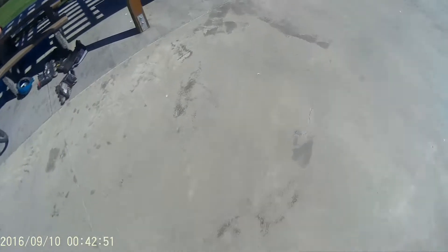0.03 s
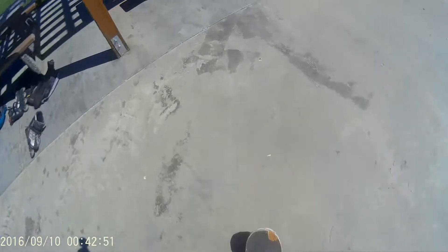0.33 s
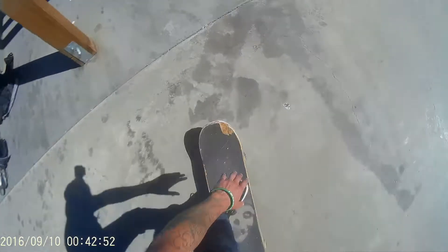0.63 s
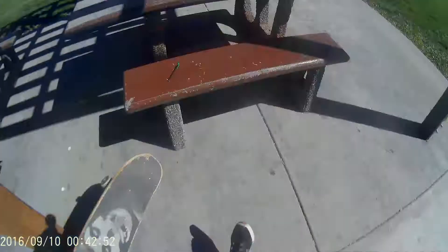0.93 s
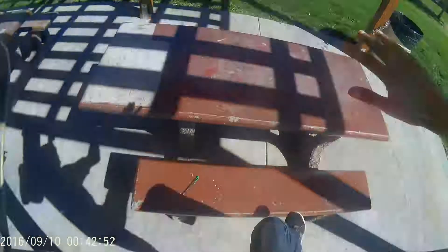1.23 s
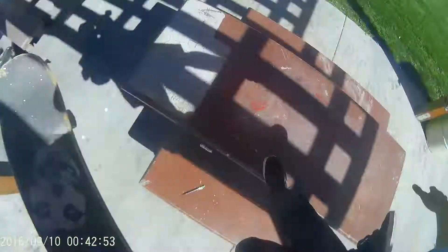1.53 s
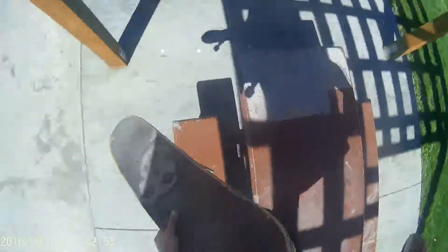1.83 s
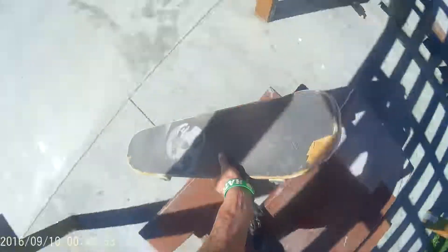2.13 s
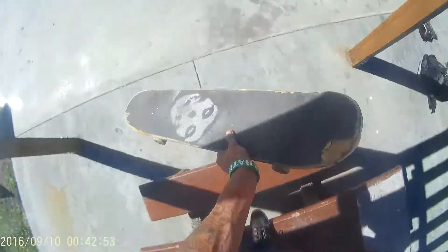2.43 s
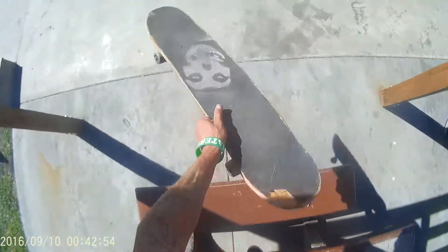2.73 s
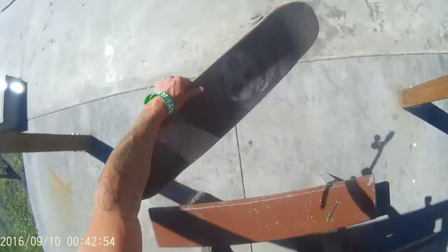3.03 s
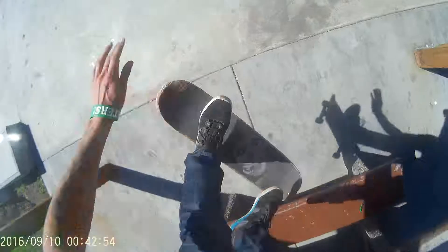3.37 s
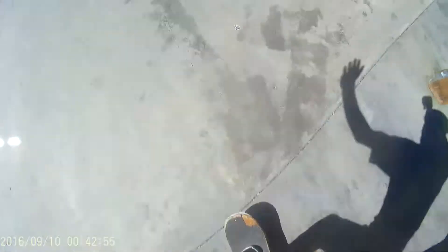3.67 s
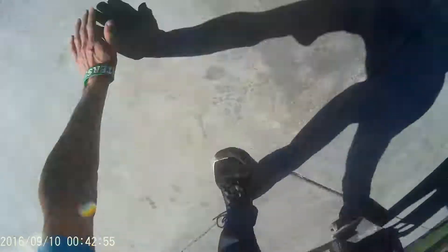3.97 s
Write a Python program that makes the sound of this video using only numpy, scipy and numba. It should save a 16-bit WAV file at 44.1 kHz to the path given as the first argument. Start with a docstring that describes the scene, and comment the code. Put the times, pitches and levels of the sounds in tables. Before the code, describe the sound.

Skateboard wheels rumble, spin freely while carried, then the board slams down and rolls off.

```python
"""A concrete yard with a picnic table, heard up close from a body camera.
A skateboard rumbles over grit, is flipped up with a scrape and a squeak, and is carried over the
table, wheels spinning down, loose trucks ticking, soles thumping softly. It is dropped and landed on,
clatters and rolls away. The camera's case rings near 700 Hz and the landing overloads the microphone;
behind it all lie a faint echo and the open air."""
import sys
import numpy as np
from scipy import signal
from scipy.fft import rfft, irfft
from scipy.io import wavfile
from scipy.ndimage import uniform_filter1d, map_coordinates
from numba import njit

SR = 44100
rng = np.random.default_rng(int(sys.argv[2]) if len(sys.argv) > 2 else 0)


def dump_mix(stems):
    """Bounce the given channels to the path in sys.argv[1] as a 16-bit WAV at rate SR."""
    frames = np.atleast_2d(stems).T  # one column per channel
    limited = np.clip(frames, -1, 1)  # hard clip at full scale
    pcm = np.round(limited * 32767).astype(np.int16)
    wavfile.write(sys.argv[1], SR, pcm)


N = 176400
TIME_S = np.arange(N) / SR


# Wheels rolling in and away, deck groan, bearing rattle: time_s, level_db
ROLL_IN = [(0, -22), (.3, -24.5), (.48, -20.5), (.6, -19), (.72, -21.5), (.74, -23), (.768, -29.5),
           (.79, -53), (1.1, -48)]
ROLL_AWAY = [(3.56, -50), (3.62, -46), (3.69, -40.5), (3.78, -36.5), (3.81, -33.5), (3.85, -23),
             (3.88, -23.5), (3.915, -37), (3.945, -29.5), (4.0, -29)]
GROAN = [(.62, -39), (.665, -28), (.725, -40.5), (.77, -52)]
RATTLE = [(0, -60), (.42, -64), (.57, -53.5), (.62, -61), (.638, -34.5), (.66, -47), (.85, -48.5),
          (1.0, -74), (3.6, -65.5), (3.67, -56), (3.8, -58), (3.85, -39.5), (3.88, -29.5), (3.91, -46),
          (3.97, -32), (4.0, -44.5)]
# Rumble and rattle at the microphone: frequency_hz, gain_db
RUMBLE_COLOUR = [(35, -54), (60, -33.5), (90, -46.5), (133, -17), (193, -23), (236, -20), (335, -5),
                 (440, -10), (590, 1.5), (690, 2.5), (800, -8.5), (1120, -23), (1470, -40), (2300, -51.5),
                 (2870, -54.5), (5000, -89)]
RATTLE_COLOUR = [(700, -17), (1100, 10.5), (1600, -2), (2000, 0.5), (2400, -1.5), (2800, -21),
                 (3600, -26.5), (6300, -30), (7500, -30), (10000, -40.5)]

def rolling():
    """Grit under the wheels shakes the deck, which groans as it tips; the loaded bearings rattle."""
    jolts = undb(.6 * walk(per_s=62))
    rumble = colour(grains(), RUMBLE_COLOUR) * (fader(ROLL_IN) + fader(ROLL_AWAY))
    groan = unit(resonate_twice(noise(), hz=251.5, width_hz=45)) * fader(GROAN)
    rattle = colour(grains(), RATTLE_COLOUR) * fader(RATTLE)
    return jolts * (rumble + groan + rattle)


# Blows to the board, the landing loudest: start_s, boom_db, boom_pitch_hz, push_ms, clack_db
KNOCKS = [(.178, -21.5, 672, 3, -59), (.517, -8.5, 621, 5.7, -49.5), (.592, -10, 650, 2.6, -48),
          (.628, -19, 720, 1.6, -27), (.6365, -10.5, 727, 4, -30), (.696, -8.5, 744, 4.3, -55),
          (.7205, -6.5, 870, 1.74, -14), (1.016, -27, 417, 0.38, -49), (1.266, -26, 710, 1.5, -58),
          (1.357, -28.5, 705, 22, -54), (3.485, -25, 700, 5.2, -33), (3.5581, 15.5, 648, 3.2, 3),
          (3.5648, 10, 674, 1.06, 8.5), (3.5693, 17, 710, 0.6, 15), (3.5797, 9, 702, 2.5, -4),
          (3.5915, -5.5, 598, 2, -15), (3.619, -24, 630, 4.5, -39), (3.669, -27, 730, 1.6, -36),
          (3.7426, -5, 737, 6.2, -17.5), (3.768, -12.5, 719, 5, -9.5), (3.807, -20.5, 720, 4.4, -45.5),
          (3.8624, -6.5, 703, 1.82, 10), (3.8747, -9.5, 827, 1.1, -32), (3.941, -16, 720, 0.94, -23.5),
          (3.9673, -15.5, 783, 1.96, -10.5)]
# Hollow boom at the camera: pitch_ratio, level_db, t60_s
BOOM_MODES = [(0.189, -28, 0.029), (0.499, -17.5, 0.045), (.76, -16.5, 0.03), (1, 1, 0.032),
              (1.42, -16, 0.038)]
# Ring of deck and trucks: pitch_hz, level_db, t60_s
DECK_MODES = [(1035, -10.5, 0.013), (1390, -9.5, 0.014), (1617, 1, 0.013), (1932, -4.5, 0.0076),
              (2220, -6, 0.0077), (3140, -17.5, 0.022)]
# Crack of hard contact: frequency_hz, gain_db
CRACK_COLOUR = [(200, -24), (700, 6), (1600, -4), (2400, 3.5), (3500, -19.5), (7500, -21), (14000, -35.5)]

def knocks():
    """Each blow booms, rings the deck and cracks; a longer push rises slower and sounds duller."""
    spread_db, detune = 3, .03
    out, t = np.zeros(N), TIME_S[:N // 16]
    cracks = undb(-8.5) * colour(noise(), CRACK_COLOUR)
    for start, boom_db, boom_hz, push_ms, clack_db in KNOCKS:
        share, bend = rng.uniform(-1, 1, (2, len(DECK_MODES)))  # each blow has its own mix of modes
        deck = 0
        for k, (hz, db, t60) in enumerate(DECK_MODES):
            mode = (-1) ** k * sine(hz * (1 + detune * bend[k]), t)
            deck += undb(db + spread_db * share[k]) * mode * fade(t, t60)
        push_s = push_ms / 1000
        rise = np.sin(np.pi / 2 * np.minimum(t / push_s, 1))
        ringing_s = np.maximum(t - push_s / 2, 0)
        boom = sum(undb(db) * sine(boom_hz * ratio, t) * fade(ringing_s, t60)
                   for ratio, db, t60 in BOOM_MODES)
        crack = np.roll(cracks, -int(start * SR))[:len(t)] * fade(t, t60=.016)
        contact_hz = np.clip(4710 / push_ms, 1700, SR / 4)
        clack = butter(rise * (deck / 2 + crack), contact_hz)
        add(out, start, undb(boom_db) * boom * rise + undb(clack_db) * clack)
    return butter(out, hz=67, kind="high")


# Free wheels, carried near the microphone: time_s, hum_db, whirr_db
SPIN = [(.74, -40, -77.5), (.82, -37, -56.5), (1.25, -36.5, -55), (1.55, -40, -54.5), (1.75, -40, -53.5),
        (1.93, -46.5, -51), (2.3, -52.5, -56.5), (2.6, -51.5, -58), (2.9, -48, -69), (3.3, -50, -72),
        (3.55, -51.5, -70)]
# Each bearing as its wheel leaves the ground: ball_passes_per_s
BALL_RATES = [90.7, 134.9, 165]
# Resonant peaks over the spinning wheels, the bright one drifting in pitch: time_s, bright_db, low_db,
# bright_pitch_hz
SPIN_PEAKS = [(1.45, -68, -46, 1160), (1.72, -61.5, -40.5, 1850), (1.92, -55, -41, 2040),
              (2.12, -64, -49.5, 1750), (2.55, -70.5, -50.5, 1250), (2.9, -86, -63, 1140)]
# Deck hum and bearing whirr: frequency_hz, gain_db
HUM_COLOUR = [(100, 3.5), (350, 4.5), (560, -6), (780, 0), (950, -4.5), (1500, -16.5), (3000, -19)]
WHIRR_COLOUR = [(500, -29.5), (1000, 6.5), (1500, 4), (1900, 0.5), (2270, 6), (2550, -6.5), (2900, -10.5),
                (4500, -29.5)]

def spinning():
    """Each bearing repeats its roughness, ever slower as the wheel spins down; the deck hums with it."""
    lift_off_s, spin_down_s = SPIN[0][0], 4.5
    slowing = np.exp(-(TIME_S - lift_off_s) / spin_down_s)
    races = 0
    for start_rate in BALL_RATES:
        rate = start_rate * slowing * (1 + .015 * walk(per_s=40))
        bumps = rng.standard_normal(size=160)
        position = np.cumsum(rate) / SR % 1 * len(bumps)
        races += map_coordinates(bumps - bumps.mean(), [position], order=1, mode="grid-wrap")
    drive = unit(races) + .95 * noise()
    bright_hz, bright_width_hz = curve(SPIN_PEAKS, 3), 830.
    bright = sweep(sweep(drive, bright_hz, bright_width_hz), bright_hz, bright_width_hz)
    low_hz, low_width_hz = 758, 8.1
    low = resonate(resonate(noise(), low_hz, low_width_hz), low_hz, 2 * low_width_hz)
    rings = unit(bright) * fader(SPIN_PEAKS, 1) + unit(low) * fader(SPIN_PEAKS, 2)
    hum_hz = 722.3 * (1 + .018 * walk(per_s=37))
    hum = colour(sweep(drive / 2 + noise(), hum_hz, width_hz=66.), HUM_COLOUR)
    flutter = undb(-walk(per_s=37))
    whirr = colour(drive, WHIRR_COLOUR)
    return hum * flutter * fader(SPIN, 1) + whirr * fader(SPIN, 2) + rings


# Tail on the ground: time_s, hiss_db, rasp_db
SCRAPE = [(.722, -74, -48), (.731, -39, -47), (.746, -48, -50), (.764, -40, -31), (.771, -58, -34.5),
          (.783, -55, -48), (.82, -81, -72)]
# Its hiss: frequency_hz, gain_db
SCRAPE_COLOUR = [(1200, 1), (2500, 14), (4000, 5), (5300, -4.5), (6400, -11), (7500, 7), (8400, -7.5),
                 (13500, -12), (15000, -21)]
# Its rasp before the glide is applied: pitch_hz, width_hz, gain_db
RASP_BANDS = [(2110, 200, 13.5), (2550, 250, 8.5), (5200, 900, -9.5)]

def scrape():
    """The tail drags on the concrete: gritty hiss, then a rasp that slides upward."""
    slips = grains(per_s=2100, spread_db=-4)
    rasp = unit(sum(undb(db) * resonate_twice(slips, hz, width) for hz, width, db in RASP_BANDS))
    glide_per_s, glide_centre_s = 5.8, .767
    speed = np.clip(1 + glide_per_s * (TIME_S - glide_centre_s), .92, 1.12)
    rasp = map_coordinates(rasp, [np.cumsum(speed)], order=3, mode="mirror")
    hiss = colour(grains(), SCRAPE_COLOUR)
    return hiss * fader(SCRAPE, 1) + rasp * fader(SCRAPE, 2)


# Tail slipping free of the concrete: time_s, pitch_hz, level_db
SQUEAK = [(0.757, 2466, -49), (.763, 2550, -28), (0.768, 2800, -40), (.773, 2990, -28.5),
          (0.778, 3250, -43), (.784, 3270, -50), (.81, 3220, -64), (.825, 3100, -79)]

def squeak():
    """Stick and slip make a short, unsteady tone that climbs."""
    pitch_hz = curve(SQUEAK, 1) * (1 + .02 * walk(per_s=1500))
    phase = 2 * np.pi * np.cumsum(pitch_hz) / SR
    overtones = undb(-25) * (np.sin(2 * phase) + np.sin(3 * phase) / 2)
    return fader(SQUEAK, 2) * (np.sin(phase) + overtones)


# Ticks on the way over the table: start_s, level_db
TICKS = [(1.055, -39), (1.11, -37), (1.2221, -30.5), (1.315, -34), (3.185, -44.5), (3.464, -31)]
# Their ring: pitch_hz, level_db
TICK_MODES = [(560, 1), (1100, 1), (1530, -2), (3350, -17.5)]

def truck_ticks():
    """The loose trucks of the carried board tick: a dry crack and a very short ring."""
    out, t = np.zeros(N), TIME_S[:N // 16]
    rise_s = .00068
    shape = np.minimum(t / rise_s, 1) * fade(t, t60=.018)
    ring = sum((-1) ** k * undb(db) * sine(hz, t) for k, (hz, db) in enumerate(TICK_MODES))
    cracks = undb(-8) * colour(noise(), CRACK_COLOUR)
    for start, db in TICKS:
        crack = np.roll(cracks, -int(start * SR))[:len(t)]
        add(out, start, undb(db) * (ring + crack) * shape)
    return out


# Footfalls and shoves below the camera: start_s, level_db, rise_s, t60_s
STEPS = [(0.959, -44.5, 0.024, 0.34), (1.008, -44, 0.0053, 0.1), (3.271, -47.5, 0.04, 0.86),
         (3.373, -41, 0.0059, 0.039), (3.944, -33, 0.0086, 0.073)]
# Their thump: frequency_hz, gain_db
STEP_COLOUR = [(40, -29), (130, 6), (230, 5), (350, -8), (550, -36), (1200, -28), (3000, -56)]

def steps():
    """Rubber soles land with soft, dull thumps."""
    out, t = np.zeros(N), TIME_S[:N // 8]
    for start, db, rise, t60 in STEPS:
        shape = np.minimum(t / rise, 1) * fade(np.maximum(t - rise, 0), t60)
        add(out, start, undb(db) * shape * colour(noise(), STEP_COLOUR)[:len(t)])
    return out


# Reflections from farther off: frequency_hz, gain_db
YARD_COLOUR = [(150, -7), (550, -9), (1500, -3), (2300, -11), (3500, -7.5), (8000, -13.5)]

def yard_echo(direct):
    """The yard returns a faint, short echo."""
    tail = colour(noise(), YARD_COLOUR) * fade(TIME_S, t60=.19)
    tail /= np.sqrt(np.sum(tail ** 2))
    return undb(-32.5) * signal.fftconvolve(direct, tail)[:N]


# Open air all around the microphone: frequency_hz, gain_db
AIR_COLOUR = [(15, -45.5), (25, -16.5), (59, 6), (157, -13), (185, -5.5), (212, -5.5), (285, -19),
              (463, -7), (607, -1.5), (695, -3.5), (796, -15.5), (1040, -13), (1190, -32.5), (2110, -47),
              (2480, -35), (14400, -35), (16000, -61.5)]

def air():
    """Steady, quiet outdoor noise."""
    white = noise()
    dipped = white - .25 * resonate(white, hz=740, width_hz=190)
    return undb(-50.5) * colour(dipped, AIR_COLOUR)


def undb(db):
    """Decibels to gain."""
    return 10 ** (np.asarray(db) / 20)


def unit(x):
    """Scale to rms 1."""
    return x / np.sqrt(np.mean(x ** 2))


def noise():
    """White noise."""
    return rng.standard_normal(N)


def sine(hz, t):
    """A steady tone."""
    return np.sin(2 * np.pi * hz * t)


def walk(per_s):
    """Smooth random drift, rms 1."""
    hold = int(SR / per_s)
    stairs = np.repeat(noise()[:N // hold + 1], hold)
    return unit(uniform_filter1d(uniform_filter1d(stairs, hold), hold)[:N])


def grains(per_s=4000, spread_db=2.5):
    """Grit: random clicks of uneven size."""
    clicks = (rng.random(N) < per_s / SR) * np.sign(noise())
    return clicks * undb(spread_db * np.minimum(rng.exponential(size=N), np.pi))


def fade(t, t60):
    """Decay by 60 dB in t60 seconds."""
    return np.exp(-np.log(1000) * t / t60)


def curve(rows, column):
    """A table column, joined by straight lines in time."""
    rows = np.array(rows)
    return np.interp(TIME_S, rows[:, 0], rows[:, column])


def fader(rows, column=1):
    """Gain from a column of dB points; it dies away quickly outside them."""
    outside_s = np.abs(TIME_S - np.clip(TIME_S, rows[0][0], rows[-1][0]))
    return undb(curve(rows, column)) * fade(outside_s, t60=.04)


def colour(x, points):
    """Shape a sound by (Hz, dB) points; rms 1."""
    hz, db = np.array(points).T
    bins_hz = np.maximum(np.arange(N // 2 + 1) * SR / N, 1)
    gain = undb(np.interp(np.log(bins_hz), np.log(hz), db))
    return unit(irfft(rfft(x) * gain, N))


def butter(x, hz, kind="low", order=2):
    """A gentle low-pass or high-pass."""
    return signal.sosfilt(signal.butter(order, hz, kind, fs=SR, output="sos"), x)


def resonate(x, hz, width_hz):
    """One resonance, gain 1 at its centre."""
    return signal.lfilter(*signal.iirpeak(hz, hz / width_hz, fs=SR), x)


def resonate_twice(x, hz, width_hz):
    """A resonance with steeper sides."""
    return resonate(resonate(x, hz, width_hz), hz, width_hz)


@njit
def sweep(x, hz, width_hz):
    """A resonance whose centre moves, gain 1 at the centre."""
    y, band_state, low_state = np.empty(len(x)), 0., 0.
    for i in range(len(x)):
        tuning, damping = np.tan(np.pi * hz[i] / SR), width_hz / hz[i]
        band = (band_state + tuning * (x[i] - low_state)) / (1 + tuning * (tuning + damping))
        band_state = 2 * band - band_state
        low_state += 2 * tuning * band
        y[i] = damping * band
    return y


def add(out, start_s, x):
    """Mix x in at a time."""
    i = int(start_s * SR)
    out[i:i + len(x)] += x[:N - i]


def scene():
    """Board and feet up close, the yard and the air behind, in mono."""
    direct = rolling() + spinning() + knocks() + truck_ticks() + scrape() + squeak() + steps()
    return (direct + yard_echo(direct) + air())[None]


def record(dry):
    """The body camera clips, softens the treble, adds pulsing hiss and cuts the top."""
    first_s, period_s, hold_s = .205, .97, .19
    hiss = undb(-65.5) * noise() * ((TIME_S - first_s) % period_s < hold_s)
    clip_level, top_hz = .88, 16200
    clipped = dry / (1 + (dry / clip_level) ** 12) ** (1 / 12)
    softened = butter(clipped, hz=15000, order=1)
    return signal.sosfilt(signal.ellip(8, .2, 70, top_hz, fs=SR, output="sos"), softened + hiss)


dry = scene()
out = record(dry)
dump_mix(out)
```